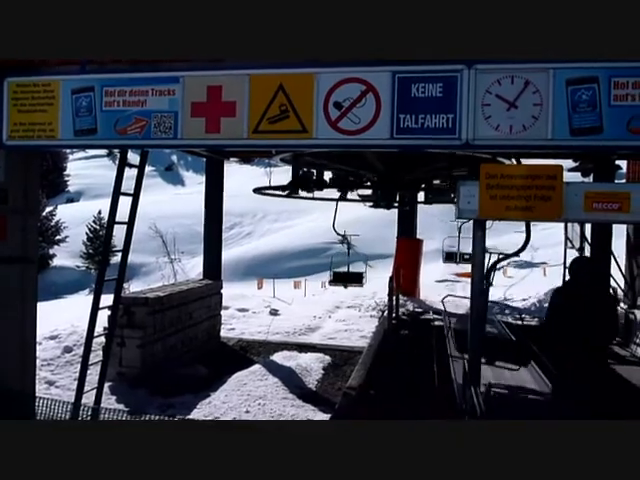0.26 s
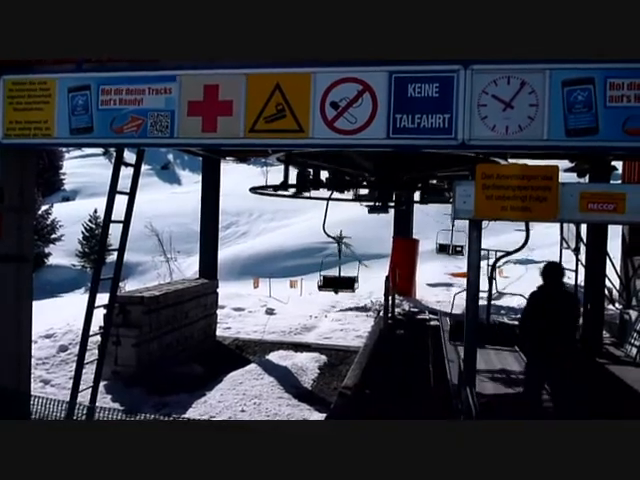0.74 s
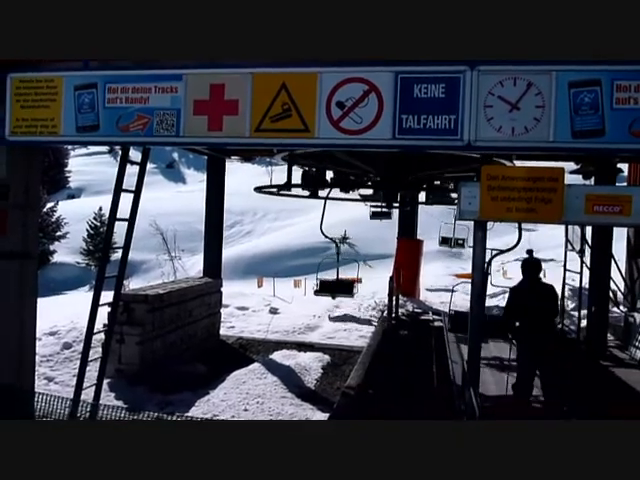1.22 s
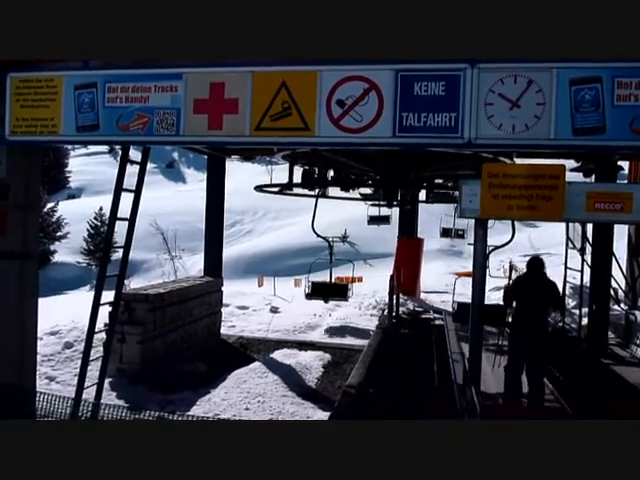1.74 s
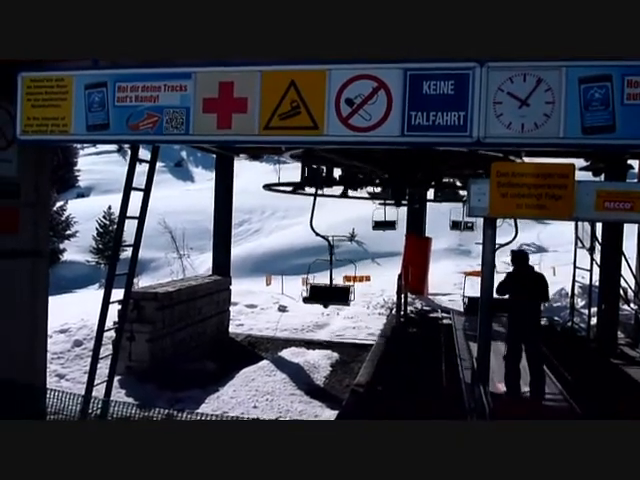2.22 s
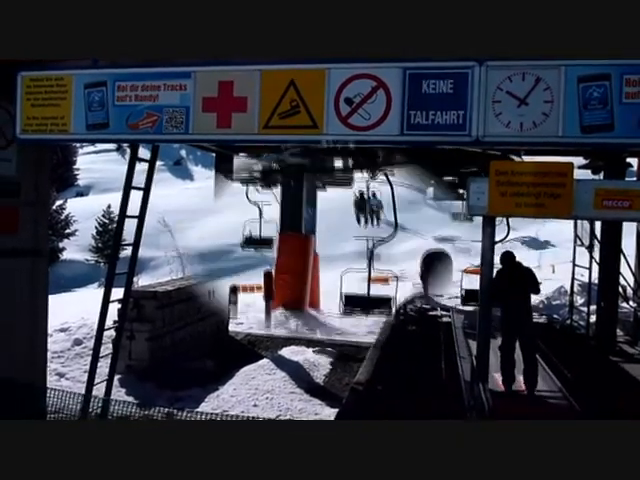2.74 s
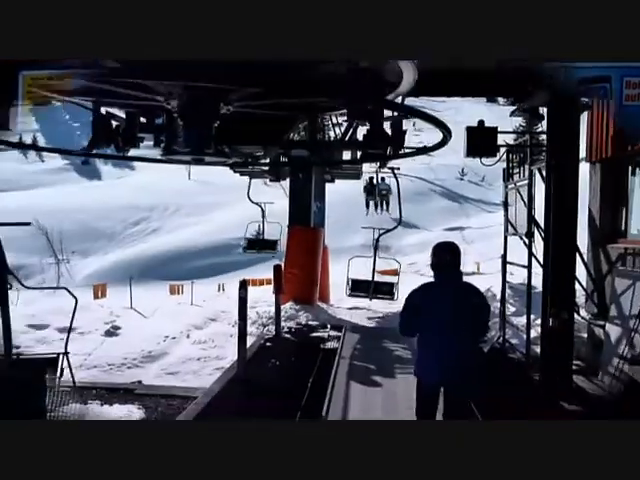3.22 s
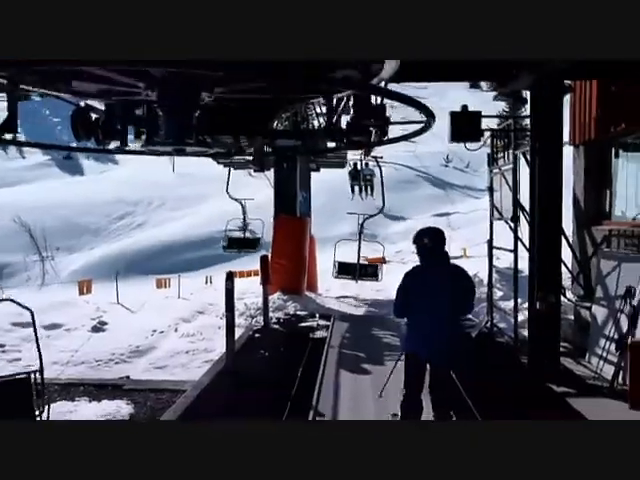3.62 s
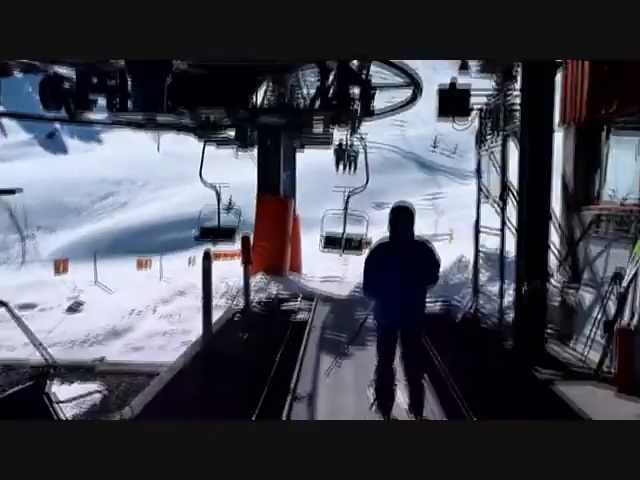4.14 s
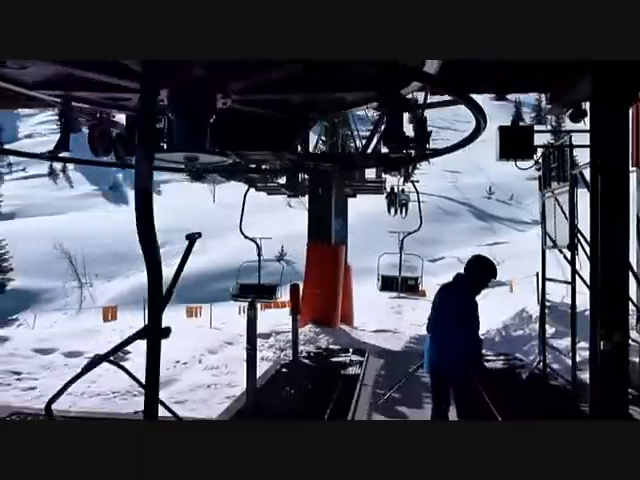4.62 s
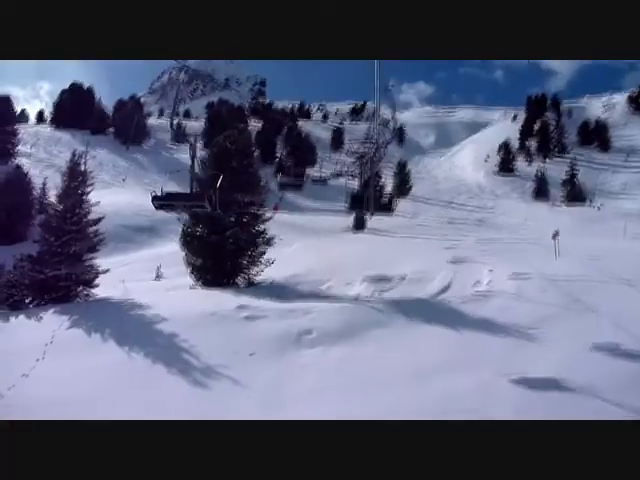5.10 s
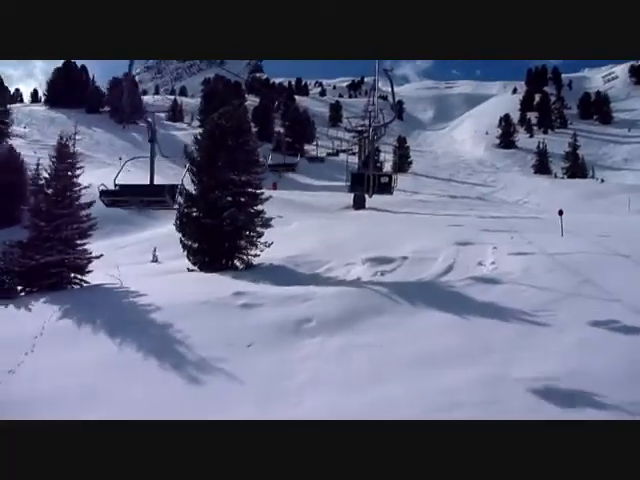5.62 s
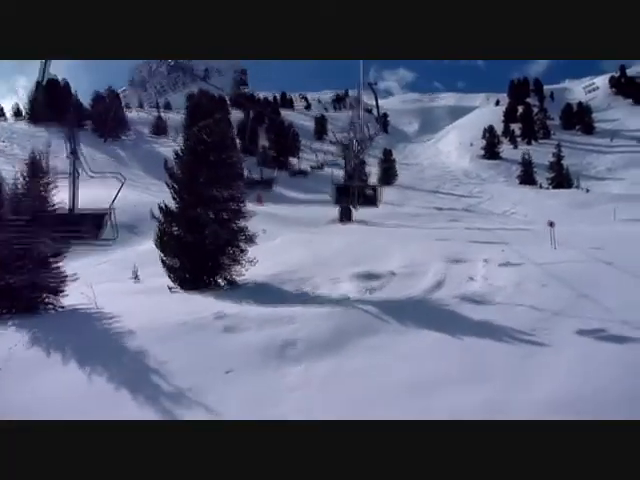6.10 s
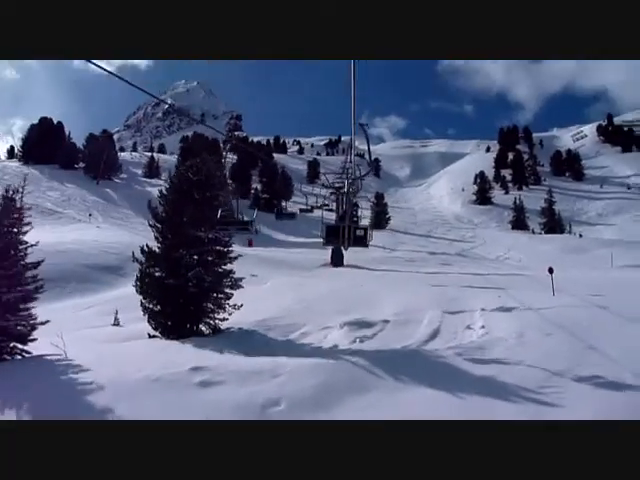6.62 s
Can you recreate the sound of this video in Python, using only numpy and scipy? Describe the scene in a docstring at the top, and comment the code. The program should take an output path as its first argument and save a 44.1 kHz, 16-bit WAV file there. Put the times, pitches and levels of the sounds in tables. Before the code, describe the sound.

Under a chairlift station roof, a steady gear whine with fluttering high overtones sits over motor hum and rumble. Grainy ski swishes pass early, bindings click sharply near two seconds, and a chair rounding the wheel brings a boom and rattling clatter around four. A hard cut near five leads to a far quieter open slope: soft air hiss, faint rustle, tiny ticks and growing double metal clacks. Small camera microphone, thin bass and dull top.

```python
"""Chairlift station, then the ride

Under the station roof a gearbox whines (wandering sines at three tooth-mesh orders and a faint fourth)
over drive hum, shaft lines and a boom, with rumble and passing skis as banded noise.
Bindings click: ticks are resonant noise bursts, clacks are ringing modes with a dry crack.
A hard cut leads to a chair on the rope outdoors: soft air noise, a light rustle, a rope drone,
the whine far away, small ticks and double clacks of metal."""
import sys
import numpy as np
from scipy import signal
from scipy.fft import rfft, irfft, next_fast_len
from scipy.io import wavfile
from scipy.ndimage import uniform_filter1d

SR = 44100
rng = np.random.default_rng(int(sys.argv[2]) if len(sys.argv) > 2 else 0)


def gain_from_db(level_db):
    """Turn a decibel level (scalar or array-like) into a linear amplitude factor."""
    decades = np.asarray(level_db, float) / 20
    return 10 ** decades


def master_out(mix):
    """Clip the mix to full scale and print it as 16-bit PCM to the path in sys.argv[1]."""
    frames = np.transpose(np.atleast_2d(mix))
    ceiling = np.clip(frames, -1, 1)
    pcm = np.round(ceiling * 32767).astype(np.int16)
    wavfile.write(sys.argv[1], SR, pcm)


N = 302526
T = np.arange(N) / SR

# gear mesh frequency: t/s, f/Hz
MESH = [(0.0, 677.7), (.5, 677.7), (1.3, 676.4), (1.9, 677.4), (3.1, 677), (3.8, 677.8), (4.3, 677.1),
        (4.95, 677.9)]
# rumble; steady at the entrance, a dip at the cross-fade to the ramp, fuller as a chair rounds the wheel:
# t/s, level/dB
RUMBLE_LEVEL = [(0.0, -44), (.9, -43.5), (1.02, -41), (1.25, -47.5), (1.5, -43.5), (1.6, -44.5), (2.7, -44),
                (3.0, -46.5), (3.2, -44.5), (3.7, -43), (3.9, -40.5), (4.3, -38.5), (4.5, -41), (4.95, -40)]
# hard cut: station stops t/s, faint tail ends t/s, ride begins t/s
CUT_S = (4.9585, 4.982, 4.9975)


def curves(table):
    """Columns after the first, interpolated over time."""
    s, *columns = np.transpose(table)
    return [np.interp(T, s, c) for c in columns]


def unit(x):
    """Scale to rms 1."""
    return x / np.sqrt(np.mean(x ** 2))


def walk(rate):
    """Random levels joined smoothly, rate a second, spread near 1."""
    k = int(SR / rate)
    count = N // k + 2
    joined = np.interp(np.arange(N), k * np.arange(count), rng.standard_normal(count))
    return 1.28 * uniform_filter1d(joined, k)


def tone(hz, db, waver_db, rate):
    """A sine about a given rms level whose strength and phase wander."""
    phase = 2 * np.pi * (np.cumsum(hz + 0 * T) / SR + rng.random()) + 0.25 * walk(rate)
    return np.sqrt(2) * gain_from_db(db + waver_db * walk(rate)) * np.sin(phase)


def hiss(spectrum, lo_hz, hi_hz, flicker_db, rate, grit):
    """Shaped noise, rms 1 from lo to hi, its third-octave bands then flickering alone; grit grains the treble."""
    size = next_fast_len(N)
    f = np.maximum(np.arange(size // 2 + 1) * SR / size, 1)
    hz, db = np.transpose(spectrum)
    grains = unit(gain_from_db(grit * np.minimum(rng.exponential(size=N // 64 + 1), 4)).repeat(64)[:N])
    shaped = rfft(rng.standard_normal(N), size) * gain_from_db(np.interp(np.log(f), np.log(hz), db))
    inside = (f > lo_hz) & (f < hi_hz)
    shaped = shaped / np.sqrt(2 * np.sum(np.abs(shaped[inside]) ** 2) / size / N)
    out = 0
    for step in range(16, 41):  # thirds of an octave above 1 Hz
        weight = np.clip(1 - np.abs(3 * np.log2(f) - step), 0, 1)
        band = irfft(shaped * weight, size)[:N]
        out = out + band * gain_from_db(flicker_db * walk(rate)) * (grains if step > 34 else 1)
    return out


def ring(hz, t60, length):
    """One decaying mode."""
    t = np.arange(length) / SR
    return np.sin(2 * np.pi * hz * t) * np.exp(-np.log(1000) * t / t60)


def add(out, s, peak_db, sound):
    """Place a sound at its time and peak level."""
    i = int(s * SR)
    sound = sound[:N - i]
    out[i:i + len(sound)] += gain_from_db(peak_db) * sound / np.abs(sound).max()


def swell(s, db, rise, fall):
    """Gain of a bell that rises and falls around a moment."""
    return gain_from_db(db) * np.exp(-0.5 * ((T - s) / np.where(T < s, rise, fall)) ** 2)


def between(entrance, ramp):
    """Cross-fade from the entrance value to the ramp value."""
    # cross-fade: start t/s, end t/s
    step_s = (2.68, 3.6)
    return entrance + np.interp(T, step_s, (0, 1)) * (ramp - entrance)


def by_place(entrance, ramp, loaded):
    """Value by place, replaced while a chair loads the wheel."""
    # load: begins t/s, full t/s, still full t/s, gone t/s
    load_s = (3.7, 3.85, 4.3, 4.45)
    load = np.interp(T, load_s, (0, 1, 1, 0))
    return (1 - load) * between(entrance, ramp) + load * loaded


def gear_whine():
    """Tooth-mesh orders under the roof's standing waves, each beating with two copies of random weight."""
    # whine orders 1 to 3: t/s, level/dB
    first_order, second_order, third_order = [(0.0, -34), (0.05, -33), (0.36, -30), (0.41, -34),
                                              (1.02, -31.5), (1.09, -38.5), (1.13, -36), (2.16, -34),
                                              (2.26, -30.5), (2.33, -39), (2.63, -31.5), (2.77, -41),
                                              (2.84, -34), (3.05, -51), (3.09, -41), (3.38, -47.5),
                                              (3.46, -32.5), (3.57, -43.5), (4.08, -28), (4.22, -44),
                                              (4.29, -29), (4.38, -45), (4.55, -41), (4.62, -31),
                                              (4.84, -32.5), (4.95, -37.5)], [(0.0, -37), (0.11, -31), (0.16, -39.5),
                                                             (0.45, -32.5), (0.5, -35.5), (0.74, -34.5),
                                                             (0.88, -41), (1.07, -32), (1.1, -40),
                                                             (1.34, -44), (1.38, -37), (1.57, -42),
                                                             (1.6, -35), (2.73, -36.5), (2.8, -42),
                                                             (2.91, -35.5), (2.99, -56), (3.03, -39),
                                                             (3.07, -43.5), (3.2, -32), (3.65, -36),
                                                             (3.75, -46.5), (3.94, -29), (4.12, -40.5),
                                                             (4.56, -34), (4.6, -45), (4.69, -41),
                                                             (4.76, -52), (4.84, -31), (4.95, -39.5)], [(0.0, -34), (0.08, -31),
                                                                             (0.26, -40), (0.27, -34),
                                                                             (0.43, -29.5), (0.5, -36),
                                                                             (0.62, -28), (0.69, -39),
                                                                             (0.84, -31), (0.88, -34),
                                                                             (1.09, -30), (1.14, -37.5),
                                                                             (1.52, -35), (1.58, -31.5),
                                                                             (1.71, -35), (1.75, -28),
                                                                             (1.9, -34), (1.94, -43.5),
                                                                             (2.11, -29), (2.14, -34.5),
                                                                             (2.29, -29), (2.43, -37.5),
                                                                             (2.45, -32.5), (2.52, -35),
                                                                             (2.54, -33), (2.67, -48),
                                                                             (2.72, -33.5), (3.12, -40),
                                                                             (3.31, -31), (3.38, -42),
                                                                             (3.58, -32), (3.64, -35),
                                                                             (3.69, -30), (3.8, -33),
                                                                             (3.9, -26.5), (4.07, -44),
                                                                             (4.2, -26), (4.26, -53),
                                                                             (4.33, -29.5), (4.41, -40),
                                                                             (4.44, -27), (4.49, -25.5),
                                                                             (4.62, -37.5), (4.66, -29.5),
                                                                             (4.84, -29), (4.95, -34.5)]
    # order 4: entrance level/dB, ramp level/dB
    fourth_db = (-58, -53.5)
    echo_share, fades_per_s = (0.12, 0.19, 0.2, 0.6), 34.0  # reflections, one share per order
    fade_depth = between(0.88, 2.1)  # deeper under the wheel
    mesh_hz, = curves(MESH)
    order_db = curves(first_order) + curves(second_order) + curves(third_order) + [between(*fourth_db)]
    out = 0
    for order, (db, share) in enumerate(zip(order_db, echo_share), 1):
        echoes = [share * fade_depth * walk(fades_per_s) for _ in range(2)]
        for weight in [1] + echoes:
            out = out + weight * tone(order * mesh_hz, db, waver_db=0.4 * order, rate=35)
    return out


def drive_hum():
    """Drive tones of fixed pitch, most of them orders of a 45.45 Hz motor or of the mains."""
    # tones: f/Hz
    hum_hz = [118.4, 181.8, 227.2, 272.7, 300.2, 363.6, 372, 409, 422, 454.4, 499.9, 545.4, 599.5, 899, 650,
              703, 722, 3414]
    # per tone: entrance level/dB, ramp level/dB, wheel-loaded level/dB, waver/dB
    hum_db = [(-58, -68.5, -73.5, 1), (-57, -58, -56, 3.5), (-52, -53.5, -53.5, 2), (-59.5, -52.5, -57, 3),
              (-46.5, -53, -56, 2), (-41, -45, -45, 1.5), (-43.5, -63, -62, 0), (-43, -51.5, -52, 3),
              (-51, -60.5, -66, 3.5), (-41.5, -45, -51, 0), (-46, -66, -55, 3), (-61.5, -55.5, -49.5, 1.5),
              (-57.5, -52.5, -41.5, 3), (-62.5, -54.5, -51.5, 5), (-52.5, -51, -52, 1.5),
              (-53.5, -53, -48, 3), (-58, -60, -55, 3.5), (-57.5, -54.5, -50, 4)]
    out = 0
    for hz, (entrance, ramp, loaded, waver_db) in zip(hum_hz, hum_db):
        db = by_place(entrance, ramp, loaded) + 1.5 * walk(4.06)
        out = out + tone(hz, db, waver_db=waver_db, rate=16)
    return out


def shaft_chatter():
    """A shaft pattern that flips sign every turn: lines midway between shaft orders, riding on the rumble level."""
    # lines upward from first_line, over the rumble; the whine covers the silent pair:
    # entrance level/dB, ramp level/dB, wheel-loaded level/dB
    line_db = [(-8, -9, -7.5), (-14.5, -3.5, -5.5), (-15.5, -2.5, -3), (-6.5, -6, -6), (-11.5, -10, -24),
               (-8.5, -12, -14.5), (-15.5, -6, -0.5), (-20.5, -16, -15), (-6.5, -4.5, -14),
               (-11, -20.5, -5.5), (-13.5, -25, -3), (-9, -9.5, -9), (-11, -5.5, -21), (-15.5, -7.5, -4),
               (-9.5, -4.5, -7), (-18, -0.5, -9.5), (-21, -13.5, -9.5), (-7, -15.5, -4.5),
               (-0.5, -10.5, -6), (-7.5, -6.5, -17), (-14.5, -9.5, -4), (-13.5, -16.5, -6.5),
               (-24, -9, -16), (-18.5, -4, -13), (-12.5, -9, -8), (-17, -11, -12), (-14, -13.5, -3),
               (-4, -13.5, 0.5), (-56, -58, -54.5), (-47.5, -58, -55), (-6.5, -2, -0.5), (-9, -6, 0.5),
               (-19.5, -13, -21)]
    teeth, first_line = 31, 64.5  # first_line in shaft orders
    shaft_hz = np.mean(curves(MESH)[0]) / teeth
    lines = sum(tone(shaft_hz * (first_line + k), by_place(*levels), waver_db=1.5, rate=4.01)
                for k, levels in enumerate(line_db))
    return gain_from_db(curves(RUMBLE_LEVEL)[0]) * lines


def station_rumble():
    """Broad machine noise that follows the rumble level."""
    # spectrum: f/Hz, relative density/dB
    rumble_spectrum = [(50, -42.5), (80, -29.5), (110, -17.5), (200, -10), (365, -7.5), (600, -7),
                       (800, -11), (1130, -14.5), (1400, -11.5), (2050, -9), (2250, -16.5), (4300, -21),
                       (6000, -26), (7900, -41.5)]
    noise = hiss(rumble_spectrum, 698, 1376, flicker_db=1.5, rate=7.4, grit=0.25)
    return gain_from_db(curves(RUMBLE_LEVEL)[0]) * noise


def skis():
    """Grainy noise of skis on snow: a steady shuffle in the queue, bell-shaped swells as skis glide past."""
    # spectrum: f/Hz, relative density/dB
    ski_spectrum = [(300, -18.5), (800, -4.5), (1500, -1), (2400, -0.5), (3500, 1), (4500, -0.5),
                    (6000, -8), (7200, -15.5), (7900, -24.5)]
    # glides: closest pass t/s, level/dB, rise/s, fall/s (bell widths)
    glides = [(1.03, -41.5, 0.064, 0.049), (1.22, -29.5, 0.069, 0.093), (1.42, -35.5, 0.054, 0.086),
              (3.79, -41.5, 0.097, 0.046), (3.991, -37, 0.076, 0.049), (4.3, -50.5, 0.062, 0.077),
              (4.6, -50, 0.03, 0.066)]
    shuffle_db = -43.5
    gliding = gain_from_db(shuffle_db + 0.8 * walk(9)) + sum(swell(*glide) for glide in glides)
    return gliding * hiss(ski_spectrum, 2500, 7500, flicker_db=1.1, rate=25, grit=1.0)


def station():
    """Sum of the machinery and the skis under the roof."""
    return gear_whine() + drive_hum() + panel_boom() + shaft_chatter() + station_rumble() + skis()


def ticks():
    """Short bursts of noise, each coloured by one broad resonance."""
    # small dry ticks: t/s, peak level/dB, f/Hz, width/Hz, t60/s
    tick_table = [(0.554, -27.5, 4500, 3000, 0.033), (1.873, -25, 5000, 2600, .008),
                  (1.8878, -13.5, 3980, 1900, 0.0098), (1.8882, -22, 6000, 1400, 0.005),
                  (1.912, -33, 5500, 3000, .03), (1.921, -28, 5900, 4000, 0.061),
                  (1.934, -11.5, 5050, 4200, 0.0053), (3.169, -31, 5500, 3000, 0.022),
                  (3.429, -29, 5330, 3000, 0.018), (4.205, -20.5, 4400, 900, 0.27),
                  (4.206, -16, 3040, 1200, 0.14), (4.231, -29, 3980, 2500, 0.1),
                  (4.30, -24, 3760, 1990, 0.081), (5.11, -39, 4400, 500, 0.033),
                  (5.111, -38, 2600, 500, .04), (5.21, -40, 3750, 500, .02), (5.228, -40, 2160, 300, 0.035),
                  (5.365, -45, 4000, 400, .02), (5.404, -36, 5500, 3000, .006),
                  (5.469, -40, 2170, 400, 0.027), (5.543, -36.5, 2120, 403, 0.082),
                  (5.65, -38.5, 4170, 2000, 0.11), (5.7132, -29.5, 5170, 2200, 0.016),
                  (6.035, -36, 3547, 3000, 0.035), (6.054, -35, 3460, 3000, 0.043),
                  (6.07, -39.5, 4460, 3000, 0.15), (6.19, -39, 2200, 500, 0.068),
                  (6.271, -38, 4000, 4000, 0.092), (6.432, -39, 2260, 600, 0.034),
                  (6.432, -46, 4500, 1000, 0.058), (6.536, -40, 4000, 4000, 0.039)]
    out = np.zeros(N)
    for s, peak_db, hz, width, t60 in tick_table:
        burst = rng.standard_normal(6000) * np.exp(-np.log(1000) * np.arange(6000) / SR / t60)
        if t60 < 0.012:  # the driest start with a clean snap
            burst[[0, 24]] += 4 * np.array([1, -0.3])
        band_hz = np.clip([hz - width / 2, hz + width / 2], 300, 9000)
        resonance = signal.butter(2, band_hz, "bandpass", fs=SR, output="sos")
        add(out, s, peak_db, signal.sosfilt(resonance, burst))
    return out


def panel_boom():
    """A panel that booms as a chair rounds the wheel: one wavering sine of drifting pitch."""
    # boom: t/s, f/Hz, level/dB
    boom_table = [(3.15, 323, -70), (3.33, 323.4, -48), (3.5, 323.5, -39), (3.68, 326, -35.5),
                  (3.73, 325, -46), (3.78, 324, -35), (4.1, 324, -40), (4.26, 323.9, -50),
                  (4.31, 339.8, -40), (4.37, 323, -45), (4.43, 314, -35), (4.48, 323.4, -62),
                  (4.56, 315.4, -46), (4.6, 303.4, -42), (4.72, 305.4, -47), (4.95, 303.4, -48)]
    return tone(*curves(boom_table), waver_db=2.0, rate=22)


def clacks():
    """Each blow rings the fitting a little differently; a judder of small knocks and a faint rattle follow."""
    # modes of the struck fitting: f/Hz, relative level/dB, free t60/s
    fitting = [(910, -21, 0.03), (1240, -9, 0.047), (1630, -1, 0.027), (2328, 1, 0.024), (2600, -11, 0.019),
               (2920, -6.5, .008), (3300, -3.5, 0.022), (3650, -8, 0.014), (4000, -9.5, 0.017),
               (4325, 2, 0.019), (4400, -4.5, 0.014), (4630, -3, 0.012), (4885, -0.5, 0.023),
               (5170, -3, .022), (5340, -7.5, 0.018), (5870, -5.5, 0.012), (6110, -12.5, 0.019),
               (6660, -7.5, 0.014), (7200, -12.5, 0.0091)]
    # blows: t/s, peak level/dB, brightness/(dB per octave)
    blows = [(4.203, -19, 2), (4.224, -20.5, 7), (4.236, -22, -1), (4.256, -25, -6), (4.268, -26, -6),
             (4.281, -22, -11), (4.289, -25, -6), (4.3, -27, -1), (4.322, -27, -3), (4.345, -27, -5),
             (5.615, -19, -0.5), (5.8841, -15, 0), (5.8997, -18.5, 2), (5.91, -28, 4), (6.2148, -6.5, 0.5),
             (6.2263, -13.5, 0.5), (6.2343, -29, 0), (6.4861, -7.5, 2), (6.4975, -11.5, 1), (6.7735, -8, 3),
             (6.7805, -19, 8.5), (6.785, -12, 2.5), (6.7935, -23, 2)]
    judder_s = 0.004
    out = np.zeros(N)
    t = np.arange(2048) / SR
    judder = gain_from_db(-25) * np.exp(-t / 0.006) / (1 + (t / judder_s) ** 8)
    judder = judder + gain_from_db(-38) * np.exp(-t / 0.012)  # faint rattle
    choke = 1 / (1 + (t / judder_s / 1.6) ** 6)  # parts settle against each other
    crack_decay = np.exp(-t / 0.0009) + gain_from_db(-6) * np.exp(-t / 0.0044)
    highpass = signal.butter(4, 850, "highpass", fs=SR, output="sos")  # too small to give bass
    for s, peak_db, bright_db in blows:
        modes = 0
        for hz, db, t60 in fitting:
            gain = gain_from_db(db + bright_db * np.log2(hz / 3000) + rng.standard_normal())
            detune = 1 + 0.008 * rng.standard_normal()
            onset = np.minimum(t * hz, 1)  # builds over about a cycle
            modes = modes + gain * ring(hz * detune, t60, len(t)) * onset
        damped = modes * choke
        knock = rng.standard_normal(len(t))
        crack = np.diff(knock, prepend=0)[::-1] * crack_decay  # dry contact noise
        juddering = np.convolve(damped, knock * judder)[:len(t)]
        blow = gain_from_db(-14.5) * modes + damped + juddering + crack
        add(out, s, peak_db, signal.sosfilt(highpass, blow))
    return out


def ride_air():
    """Air and rope noise that thins out a little as the chair climbs."""
    # spectrum: f/Hz, relative density/dB
    air_spectrum = [(50, -39), (80, -2), (100, 0), (150, 2.5), (300, 1.5), (650, -1), (1000, -3.5),
                    (1600, -6.5), (2400, -12), (4400, -15), (6000, -16), (7900, -26)]
    start_db, slope_db_per_s = -48, -1.1
    air_db = start_db + slope_db_per_s * (T - CUT_S[2]) + 1.4 * walk(11)
    return gain_from_db(air_db) * hiss(air_spectrum, 240, 1400, flicker_db=0.5, rate=11, grit=0.67)


def rustle():
    """Loose parts rustling: faint noise, very grainy in the treble."""
    # spectrum: f/Hz, relative density/dB
    rustle_spectrum = [(900, -35), (2100, 2.5), (3200, -1), (4200, -1.5), (5500, -9.5), (7900, -26)]
    noise = hiss(rustle_spectrum, 3100, 7000, flicker_db=2.0, rate=15, grit=2.2)
    return gain_from_db(-58 + 1.5 * walk(20)) * noise


def far_whine():
    """The gear whine left far behind: three wavering sines of fixed pitch."""
    # common level: t/s, level/dB
    far_level = [(5.0, -66), (5.15, -60.5), (5.7, -64.5), (5.98, -57.5), (6.2, -61), (6.3, -61),
                 (6.86, -64)]
    # partials: multiple of far_hz, relative level/dB
    far_orders = [(.5, -1.5), (1, 3), (1.5, -3)]
    far_hz = 1347.5
    far_db, = curves(far_level)
    return sum(tone(k * far_hz, far_db + db, waver_db=2.5, rate=12) for k, db in far_orders)


def rope_drone():
    """One low sine from the rope that drifts and swells."""
    # drone: t/s, f/Hz, level/dB
    drone_table = [(5.0, 151, -57), (5.22, 149.5, -62), (5.35, 149.6, -69), (5.47, 151.7, -51),
                   (5.56, 151.2, -48), (5.75, 150, -60), (5.88, 144.6, -57), (6.0, 146.8, -60),
                   (6.12, 151.3, -56), (6.25, 151, -69), (6.45, 156.3, -65), (6.6, 162.7, -57),
                   (6.75, 146, -63), (6.86, 152, -68)]
    return tone(*curves(drone_table), waver_db=3.5, rate=6.3)


def ride():
    """Sum of the steady sounds on the chair."""
    return ride_air() + rustle() + far_whine() + rope_drone()


def scene():
    """The station up to the hard cut, the ride after it; ticks and clacks in both."""
    return (np.where(T < CUT_S[1], station(), ride()) + clacks() + ticks())[None]


def top_cut(x):
    """Nothing passes above the cut-off."""
    return signal.sosfilt(signal.butter(12, 15900, fs=SR, output="sos"), x)


def record(dry):
    """A small camera: thin bass, a deep notch, no top but a faint mirror image; the hard cut follows the filters."""
    notch_hz, notch_width_hz = 2906, 303
    camera_rate_hz, mirror_gain_db, tail_db = 16000, -18.5, -30
    x = signal.lfilter(*signal.iirnotch(notch_hz, notch_hz / notch_width_hz, fs=SR), dry)
    x = signal.sosfilt(signal.butter(3, 92, "highpass", fs=SR, output="sos"), x)
    # top treble mirrored above half the camera's rate
    mixed = x * np.cos(2 * np.pi * camera_rate_hz * T)
    mirror = signal.sosfilt(signal.butter(4, (8220, 8500), "bandpass", fs=SR, output="sos"), mixed)
    x = signal.sosfilt(signal.ellip(12, 0.3, 75, 7720, fs=SR, output="sos"), x)
    x = x + gain_from_db(mirror_gain_db) * mirror
    stop_s, tail_end_s, start_s = CUT_S
    tail = gain_from_db(tail_db) * np.clip((tail_end_s - T) / 0.004, 0, 1)  # ends without a click
    gate = np.select([T < stop_s, T < tail_end_s, T < start_s], [1, tail, 0], 1)
    return top_cut(x * gate)


dry = scene()
out = record(dry)
master_out(out)
```